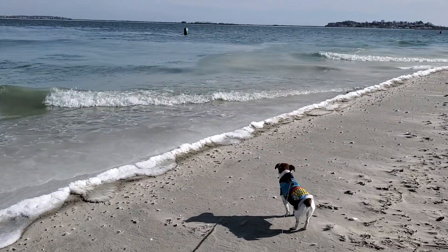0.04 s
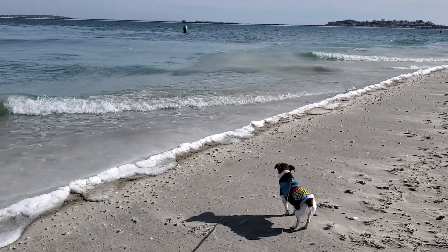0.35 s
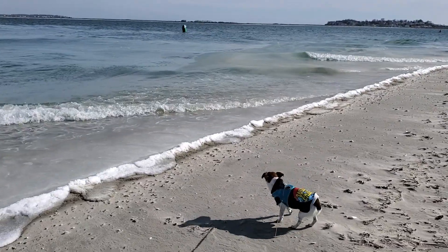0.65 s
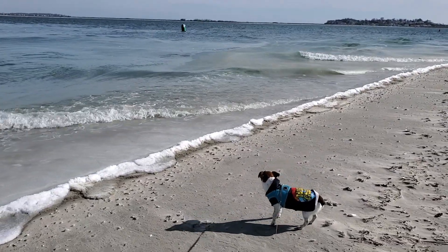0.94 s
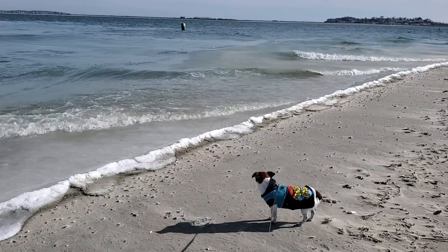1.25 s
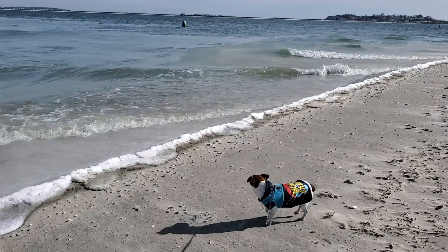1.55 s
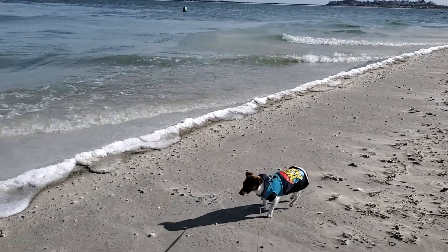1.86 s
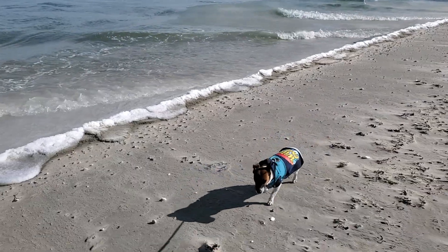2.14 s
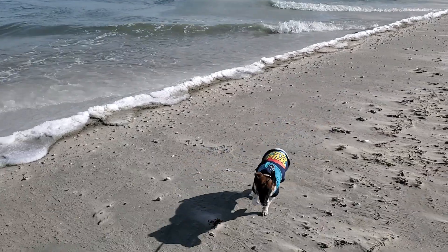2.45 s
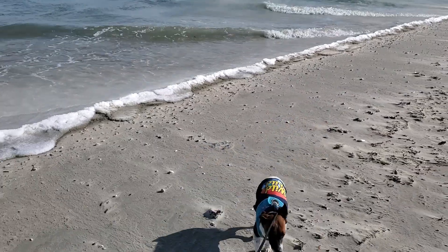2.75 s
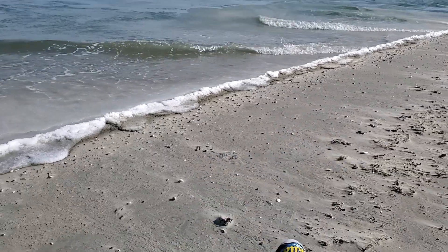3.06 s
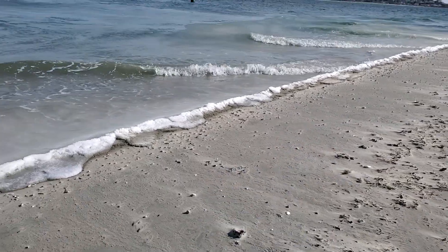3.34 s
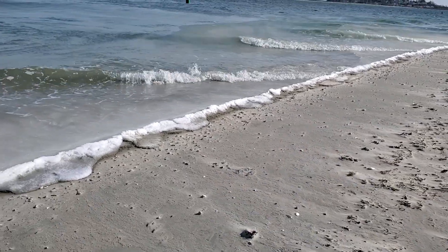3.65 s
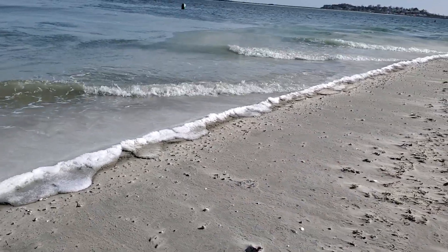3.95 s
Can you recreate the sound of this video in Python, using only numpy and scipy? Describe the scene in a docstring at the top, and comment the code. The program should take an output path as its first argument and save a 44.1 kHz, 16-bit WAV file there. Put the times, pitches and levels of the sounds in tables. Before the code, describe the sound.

Wind rumbles and flutters on the microphone, with small waves splashing on a beach behind it.

```python
"""A sandy shore, with a stereo microphone standing in a gusty breeze. Out on the water, a little to
the left, small waves churn, spill and fizz up the sand; a new one breaks near the end.
Right at the microphone, each gust sheds eddies that flutter and rasp at both ports, over a low
rumble with heavy thumps. Now and then the wind's bass drops out on one side."""
import sys
import numpy as np
from scipy import signal
from scipy.fft import rfft, irfft
from scipy.io import wavfile
from scipy.ndimage import uniform_filter1d

SR = 44100
rng = np.random.default_rng(int(sys.argv[2]) if len(sys.argv) > 2 else 0)


def int16_out(signal):
    """Quantize to a 16-bit WAV file."""
    q = np.round(np.clip(np.atleast_2d(signal).T, -1, 1) * 32767)
    wavfile.write(sys.argv[1], SR, q.astype(np.int16))


N = 176400
TIME = np.arange(N) / SR
BINS = np.fft.rfftfreq(N, 1 / SR)

# Table levels are relative; "side" is left minus right.
# Strength of the wind at the microphone: t/s, level/dB
WIND_GUSTS = [(0, -21.5), (.07, -40), (.17, -27.5), (.3, -30), (.45, -33), (.58, -35.5), (.69, -32),
              (.77, -33), (.84, -31), (.91, -39), (.96, -32.5), (1.05, -33), (1.2, -30), (1.6, -27),
              (1.68, -32), (1.705, -32.5), (1.76, -28), (1.9, -34), (2.05, -28.5), (2.3, -24), (2.5, -29.5),
              (2.65, -30.5), (2.88, -36.5), (3, -31.5), (3.11, -35.5), (3.2, -31), (3.26, -33), (3.33, -30),
              (3.45, -26), (3.55, -27.5), (3.77, -26.5), (3.81, -35), (3.9, -33.5), (4, -25.5)]
# Sharp buffets of small eddies: peak t/s, length/s, level/dB, side/dB, rasp level/dB
WIND_BUFFETS = [(0.006, 0.024, -35, 1, -41), (.138, 0.015, -22.5, 5, -40), (.218, 0.02, -17, 0, -39),
                (0.269, 0.019, -20.5, 2, -48), (0.315, 0.1, -25, -6, -56), (0.383, .02, -33, 4, -52),
                (0.398, 0.022, -32, 5, -52), (0.596, 0.015, -30, 12.5, -38),
                (0.714, 0.034, -21.5, 5.5, -49), (0.814, 0.035, -26, 0, -42), (0.845, 0.029, -24, 7.5, -41),
                (1.179, 0.016, -25, 6, -52), (1.206, 0.071, -22.5, 3.5, -43),
                (1.329, 0.039, -21.5, 9, -35.5), (1.389, 0.041, -18.5, -3, -50),
                (1.442, 0.019, -22, 0, -49), (1.506, 0.021, -16.5, 2.5, -42),
                (1.537, 0.056, -24.5, 10.5, -39), (1.593, .02, -23, -3, -46), (1.642, .024, -27, 6, -42),
                (1.676, 0.023, -20, 4.5, -35), (1.725, 0.022, -27, 5, -37), (1.751, .045, -21.5, -0.5, -38),
                (1.804, 0.025, -30, 13, -39), (1.847, .014, -24, 4, -48), (2.078, 0.047, -27, 0, -43),
                (2.139, 0.046, -17, -1, -37), (2.209, 0.028, -23, 0, -41), (2.245, 0.018, -23, 3, -36),
                (2.289, 0.038, -17.5, -2, -36), (2.357, 0.098, -25.5, -1, -46), (2.4, .02, -23.5, -5, -43),
                (2.431, 0.025, -26, -3, -42), (2.652, 0.051, -37, 4, -39), (2.72, 0.028, -28.5, -5, -41),
                (2.821, 0.028, -24, -2, -40), (2.954, 0.043, -25, -5, -56), (3, 0.035, -22, 5, -43),
                (3.049, 0.062, -27.5, -3, -41.5), (3.152, 0.027, -19.5, 6.5, -39),
                (3.295, 0.031, -21.5, -5, -41), (3.391, 0.023, -24.5, -11, -46),
                (3.434, 0.02, -31, -5, -52), (3.472, 0.031, -25, 1, -39), (3.525, .04, -25.5, 5, -43),
                (3.583, 0.014, -22, 0, -53), (3.615, 0.02, -21.5, 3.5, -40), (3.666, 0.042, -23.5, 1, -41),
                (3.704, 0.035, -19.5, -2, -39), (3.754, 0.057, -26, 3.5, -36.5),
                (3.844, 0.045, -28, -2, -60), (3.944, 0.024, -21.5, 2, -54)]
BUFFET_RISE = 0.39  # rise time over fall time
# Splashing water as coloured by the microphone's peak near 4.2 kHz: f/Hz, level/dB
SPLASH_AT_MIC = [(1200, -7), (2400, -8), (3000, -6.5), (3600, -1), (4220, 2), (4700, -6), (5200, -11.5),
                 (6500, -29), (12000, -49)]
# Fizzing foam as coloured by the microphone's treble peaks: f/Hz, level/dB
FIZZ_AT_MIC = [(3000, -42), (4500, 0), (5400, -1.5), (6600, 1.5), (7100, -2.5), (7750, 1), (8700, -5),
               (9900, -0.5), (11000, 3), (11900, -4), (12700, -5), (13800, -11.5), (15300, -1.5),
               (16000, -11.5)]


def amp(db):
    """Decibels to gain."""
    return 10 ** (np.asarray(db) / 20)


def unit(x):
    """Scales to an rms of one."""
    return x / np.sqrt(np.mean(x ** 2) + 1e-20)


def at_hz(points, hz):
    """Reads a spectrum on a log-frequency axis."""
    f, value = np.transpose(points)
    return np.interp(np.log(hz + 1), np.log(f + 1), value)


def curve(rows, column=1):
    """Reads one column of a time table at every sample."""
    rows = np.array(rows)
    return np.interp(TIME, rows[:, 0], rows[:, column])


def pan(side_db):
    """Left and right gains for a level difference."""
    return amp(np.array([[.5], [-.5]]) * side_db)


def colour(x, spectrum):
    """Filters a sound by a spectrum, at unit level."""
    return unit(irfft(rfft(x) * amp(at_hz(spectrum, BINS)), N))


def white():
    """Unrelated noise at the two ports."""
    return rng.standard_normal((2, N))


def wander(fastest_hz, slowest_hz, channels=1):
    """Random motion mostly between two rates, at unit level."""
    shape = BINS / (BINS + slowest_hz) / (1 + (BINS / fastest_hz) ** 2)
    return unit(irfft(rfft(rng.standard_normal((channels, N))) * shape, N))


def steady_noise(spectrum, window_s):
    """Coloured noise with its chance swells evened out, so that an envelope sets the strength."""
    noise = colour(white(), spectrum)
    power = uniform_filter1d(noise ** 2, int(window_s * SR), axis=-1)
    return noise / np.sqrt(abs(power) + 1e-3)


def puffs(rows, rise=1):
    """Each passing eddy swells and dies; a rise under one makes the front steeper than the back."""
    envelope = np.zeros((2, N))
    for peak_s, length_s, db, side_db, *_ in rows:
        width_s = length_s / 2 * np.where(TIME < peak_s, rise, 1)
        envelope += amp(db) * pan(side_db) * np.exp(-((TIME - peak_s) / width_s) ** 2)
    return envelope


def from_sea(x):
    """Places a pair of noises out on the water, a little left of the microphone."""
    # Lean of the sea towards the left: f/Hz, side/dB
    sea_side = [(500, 4.5), (1300, 0.5), (2100, 1.5), (2800, 1.5), (4200, 0.5), (6500, -0.5), (8700, 0.8),
                (10800, 0), (12500, 2), (13800, 4), (15500, 1)]
    # Likeness of the sea at the two ports: f/Hz, correlation
    sea_correlation = [(500, -0.51), (1300, -0.18), (2200, 0.57), (3200, -0.23), (4400, -0.034),
                       (8000, -0.0084)]
    left, unrelated = rfft(x)
    likeness = at_hz(sea_correlation, BINS)
    right = likeness * left + np.sqrt(1 - likeness ** 2) * unrelated
    return irfft(np.array([left, right]) * pan(at_hz(sea_side, BINS)), N)


def foam(spectrum, patchy_db, flicker_db, grain_db):
    """Countless tiny bursts, in patches that drift in pitch and time."""
    grains = white() * amp(grain_db * wander(900, 100, channels=2))
    cells = signal.stft(grains, nperseg=256)[2]
    patches = uniform_filter1d(rng.standard_normal(cells.shape[1:]), size=6, axis=0)  # across pitch
    patches = unit(uniform_filter1d(patches, size=18, axis=1))  # across time
    hiss = signal.istft(cells * amp(patchy_db * patches), nperseg=256)[1][:, :N]
    return colour(from_sea(hiss), spectrum) * amp(flicker_db * wander(22, 8))


def droplets(per_s=1500, pitches=28, decay_cycles=5.8, spread_db=4.5):
    """Drops and small bubbles ring for a few cycles, rising in pitch as they die."""
    drops = np.zeros((2, N))
    for hz in np.geomspace(1300, 11000, pitches):
        t = np.arange(0, 5 * decay_cycles / hz, 1 / SR)
        age = t * hz / decay_cycles
        ring = np.exp(-age) * np.sin(2 * np.pi * hz * t * (1 + 0.022 * age))
        hits = rng.random((2, N)) < per_s / pitches / SR
        strength = amp(spread_db * np.minimum(rng.exponential(1, (2, N)), 4))
        drops += signal.oaconvolve(hits * strength, ring[None], axes=1)[:, :N]
    drops = from_sea(drops)
    return unit(colour(drops, SPLASH_AT_MIC) + 0.86 * colour(drops, FIZZ_AT_MIC))


def surf():
    """Breakers churn, their crests spill and splash, and the foam behind them fizzes up the sand."""
    # Churning of the breakers: t/s, level/dB
    breakers = [(0, -50.5), (.28, -51.5), (.38, -48.5), (.52, -51), (.64, -50), (.8, -53.5), (1.12, -50.5),
                (1.5, -49.5), (1.8, -52.5), (2, -50), (2.3, -49), (2.52, -49), (2.66, -45), (2.8, -49.5),
                (2.92, -51), (3.2, -49), (3.45, -48.5), (3.65, -49), (3.85, -49), (4, -47)]
    # Breaking and foaming water: t/s, splash level/dB, fizz level/dB, spill level/dB
    waves = [(0, -49, -49, -56), (.2, -51.5, -52, -60), (.35, -50, -48.5, -56), (.55, -53.5, -51, -61),
             (.66, -48, -50, -60), (.79, -51, -52.3, -55), (.89, -47, -50.5, -63),
             (1.12, -49.5, -50.5, -59), (1.25, -48.5, -48, -52), (1.34, -52.5, -50.5, -58),
             (1.45, -50, -47, -50.5), (1.63, -51, -50.5, -59), (1.78, -51, -49.5, -50.5),
             (1.9, -51.5, -49.5, -52.5), (2.05, -51.5, -50, -57), (2.42, -51, -50, -54),
             (2.55, -52, -50.5, -57), (2.72, -48.5, -48, -52), (2.9, -52, -51, -61),
             (3.12, -53.5, -49, -70), (3.33, -49.5, -49.7, -68), (3.44, -49.5, -48, -50),
             (3.57, -45.5, -47.5, -54), (3.68, -48.5, -48.3, -59), (3.78, -45, -46.5, -61),
             (3.9, -47.5, -49, -64), (4, -46, -45.5, -54)]
    # Spectrum of churning water: f/Hz, level/dB
    churn_spectrum = [(200, 1), (500, 0), (1000, 4), (1400, 1), (2150, -.5), (2650, -13.5), (3300, -26),
                      (4500, -32), (9000, -46)]
    # Spectrum of a spilling crest: f/Hz, level/dB
    spill_spectrum = [(1500, -18), (2400, -6.5), (2750, -5), (3200, 2), (3600, -2), (4400, -31),
                      (8000, -47)]
    churn = amp(3.5) * foam(churn_spectrum, patchy_db=1.87, flicker_db=1.45, grain_db=0.5)
    spill = amp(-1.7) * foam(spill_spectrum, patchy_db=3.5, flicker_db=1.9, grain_db=3.0)
    splash = amp(-2) * foam(SPLASH_AT_MIC, patchy_db=1.6, flicker_db=1.16, grain_db=0.5)
    splash += amp(-5.5) * droplets()
    fizz = amp(-0.23) * foam(FIZZ_AT_MIC, patchy_db=1.3, flicker_db=1.0, grain_db=-0.5)
    return (churn * amp(curve(breakers))
            + splash * amp(curve(waves, column=1))
            + fizz * amp(curve(waves, column=2))
            + spill * amp(curve(waves, column=3)))


def rumble(gust_share=0.17):
    """Large eddies press on each port separately, and slacken between gusts."""
    # Slow swell of the rumble: t/s, level/dB
    swell = [(0, -28.5), (.35, -25.5), (.6, -30), (1, -29.5), (1.25, -26.5), (1.55, -28), (1.9, -24),
             (2.2, -28), (2.5, -24.5), (2.8, -31), (3.25, -28.5), (3.55, -24), (3.85, -29.5), (4, -27)]
    # Balance of the rumble between the ports: t/s, side/dB
    balance = [(0, -3.5), (1.8, -8), (2.1, -0.5), (2.6, 10), (3.3, 7), (4, -6)]
    # Spectrum of the large eddies: f/Hz, level/dB
    spectrum = [(15, -60), (28, -23), (50, -0.5), (78, -0.5), (120, -4), (180, -7), (300, -25), (600, -39),
                (1500, -87)]
    lumps = unit(amp(3.15 * wander(37, 9, channels=2) + 0.94 * wander(32, 14)))
    gust_db = curve(WIND_GUSTS)
    level_db = curve(swell) - 1.5 + gust_share * (gust_db - gust_db.mean())
    return amp(level_db) * pan(curve(balance)) * lumps * steady_noise(spectrum, window_s=0.07)


def thumps(pitch_waver=0.33):
    """Heavy eddies rock the air at each port for a few uneven cycles."""
    # Heavy eddies on the microphone: centre t/s, length/s, level/dB, side/dB, centre f/Hz
    heavy_eddies = [(.015, 0.075, -26, -10.5, 84.6), (.2, 0.024, -24, -10, 99.9),
                    (.262, 0.039, -21.5, -6, 115), (.345, 0.019, -20, 7, 71.9), (.42, .028, -24.5, -1, 90),
                    (.51, 0.043, -27.5, -12.5, 74.65), (.662, 0.018, -19, -2.5, 100.1),
                    (.863, 0.02, -17, 3.5, 86), (.946, 0.018, -21.5, 4, 99.9), (1.13, .02, -22.5, 7, 110.6),
                    (1.182, 0.016, -25.5, 3, 106.4), (1.228, 0.019, -24, 4, 100),
                    (1.26, 0.049, -27, 5, 58.6), (1.425, 0.024, -24.5, 10, 80.4),
                    (1.502, 0.027, -21.5, -11, 69.3), (1.55, 0.025, -20.5, -9, 61.2),
                    (1.627, 0.035, -19, 0, 70.6), (2.146, 0.024, -20.5, 12, 85),
                    (2.368, 0.058, -17, 2.5, 78.08), (2.52, .046, -26, 7, 103.8),
                    (2.683, 0.032, -30, 0, 85.5), (2.827, 0.029, -15, -4, 99.5),
                    (2.955, 0.02, -18.5, 3, 101), (3.024, 0.027, -19, -3, 107.2),
                    (3.055, .018, -22, 5, 110), (3.2, 0.027, -27, 4, 89.9),
                    (3.322, 0.025, -20.5, -3, 100.5), (3.365, .03, -22.5, 6, 84.9),
                    (3.514, 0.029, -12.5, 0, 80.1), (3.594, 0.031, -25, -7, 69.87),
                    (3.706, 0.015, -18, -2, 75.3), (3.822, .022, -22.5, -7, 72), (3.975, .035, -31, -5, 80)]
    hz = curve(heavy_eddies, column=4) * np.exp(pitch_waver * wander(94, 16.2, channels=2))
    turns = np.cumsum(hz, axis=1) / SR + rng.random((2, 1))
    return amp(3) * puffs(heavy_eddies) * np.sin(2 * np.pi * turns)


def buffet_rasp():
    """The front of each buffet tears at the port with a short, bright rasp."""
    # Spectrum of the tearing air: f/Hz, level/dB
    spectrum = [(250, -18), (600, -8), (850, 3), (1200, -2.5), (1700, -8), (2300, -16.5), (3200, -32),
                (8000, -64)]
    rasps = [(peak_s, length_s, db, side_db) for peak_s, length_s, _, side_db, db in WIND_BUFFETS]
    return amp(-2.5) * puffs(rasps, rise=BUFFET_RISE) * steady_noise(spectrum, window_s=0.0072)


def flutter(rasp_db=-23, rasp_growth=1.6):
    """Gusts break into eddies on the microphone: a hollow flutter, and a rasp on the strongest."""
    # Spectrum of the hollow flutter: f/Hz, level/dB
    body_spectrum = [(40, -88), (110, -7.5), (200, -2), (300, -1), (410, 1), (550, -6.5), (720, -12.5),
                     (950, -22), (1400, -36), (2000, -39.5), (3000, -60), (8000, -73)]
    # Spectrum of the rasp: f/Hz, level/dB
    rasp_spectrum = [(300, 8.5), (700, -7), (1100, 10.5), (1600, -6.5), (2200, -14.5), (3000, -11),
                     (6000, -22), (12000, -60)]
    # Balance of the rasp between the ports: t/s, side/dB
    rasp_balance = [(0, 12), (.9, -1), (1.5, 12), (2.1, 10), (2.45, -8), (2.7, 12), (3.3, 14), (3.75, 3),
                    (4, -5)]
    shared_eddies_db = 2.5 * wander(55.3, 44)
    port_eddies_db = 4.5 * wander(72, 2.4, channels=2)
    gusts = amp(curve(WIND_GUSTS) + 1.42) * unit(amp(shared_eddies_db + port_eddies_db))
    buffets = amp(-0.4) * puffs(WIND_BUFFETS, rise=BUFFET_RISE)
    force = np.hypot(gusts, buffets)  # their powers add
    body = force * steady_noise(body_spectrum, window_s=0.019)
    tearing = white() * force ** rasp_growth * amp(-wander(130, 8.9, channels=2))
    rasp = colour(tearing * pan(curve(rasp_balance)), rasp_spectrum)
    return body + amp(rasp_db) * np.std(body) * rasp


def bass_dips(wind, below_hz=235, ramp_s=0.019):
    """The wind's bass falls away briefly, at first on the left, later mostly on the right."""
    # Bass dips at the left port: start t/s, end t/s, level/dB
    left_dips = [(.05, .22, -16), (.25, .31, -15), (.43, .64, -38), (.72, .83, -20), (1.01, 1.08, -16),
                 (1.12, 1.18, 1), (1.65, 1.74, -37), (1.78, 1.84, -42), (3.94, 4.05, -7)]
    # Bass dips at the right port: start t/s, end t/s, level/dB
    right_dips = [(1.951, 2.017, -16), (2.017, 2.078, -20), (2.269, 2.342, -26), (2.428, 2.476, -8),
                  (2.511, 2.558, -11), (2.7, 2.793, -5), (2.835, 2.947, -11), (3.06, 3.172, -5),
                  (3.374, 3.418, -19), (3.617, 3.688, -18), (3.848, 3.929, -2)]
    bass_db = np.zeros((2, N))
    for port, dips in enumerate((left_dips, right_dips)):
        for start, end, db in dips:
            bass_db[port] += db * np.clip(np.minimum(TIME - start, end - TIME) / ramp_s, 0, 1)
    bass = irfft(rfft(wind) / (1 + (BINS / below_hz) ** 8), N)
    return wind - bass * (1 - amp(bass_db))


def scene():
    """Wind right on the microphone, with the wash of the shore behind it."""
    wind = flutter() + buffet_rasp() + rumble() + thumps()
    return bass_dips(wind) + surf()


def record(dry):
    """The recorder's band limit, with soft ends."""
    cutoff_hz, fade_s = 15820, 0.006
    fade = np.clip(np.minimum(TIME, TIME[-1] - TIME) / fade_s, 0, 1)
    lowpass = signal.firwin(701, cutoff_hz, window=("kaiser", 9), fs=SR)
    return signal.oaconvolve(dry * fade, lowpass[None], "same")


dry = scene()
out = record(dry)
int16_out(out)
```